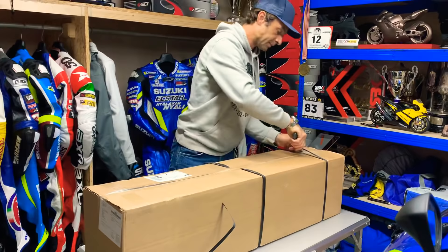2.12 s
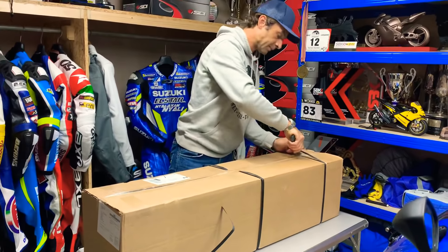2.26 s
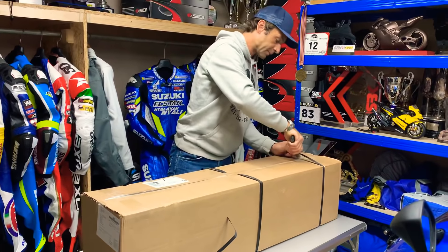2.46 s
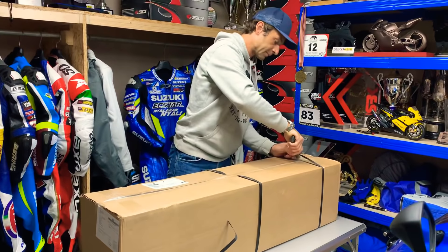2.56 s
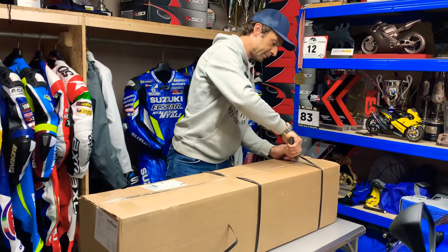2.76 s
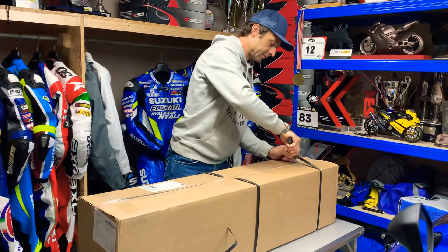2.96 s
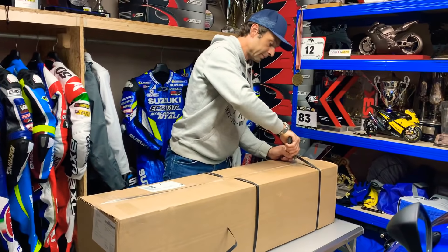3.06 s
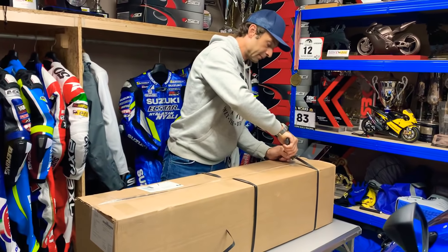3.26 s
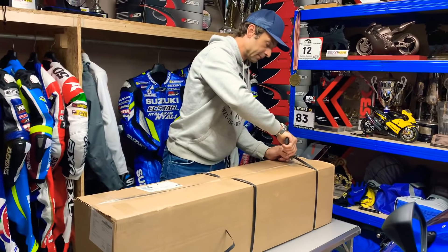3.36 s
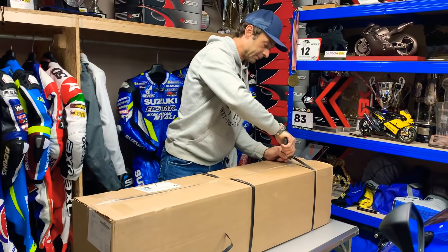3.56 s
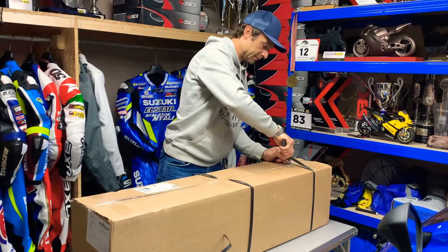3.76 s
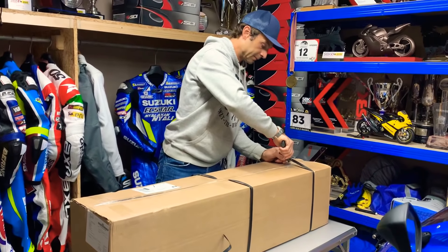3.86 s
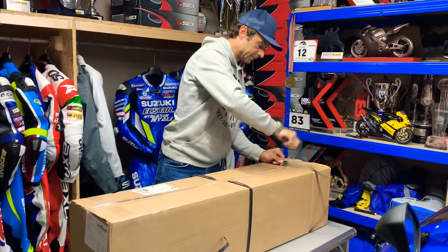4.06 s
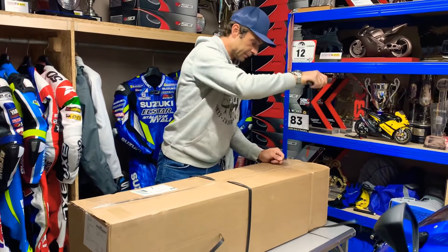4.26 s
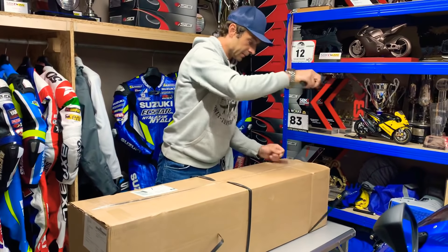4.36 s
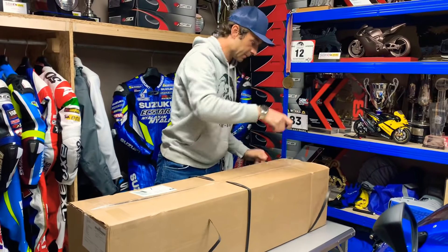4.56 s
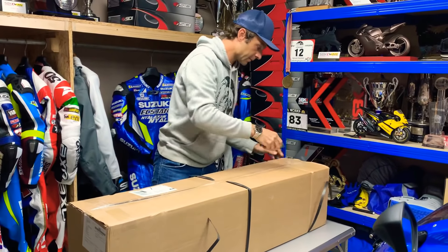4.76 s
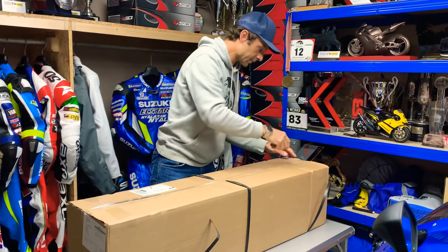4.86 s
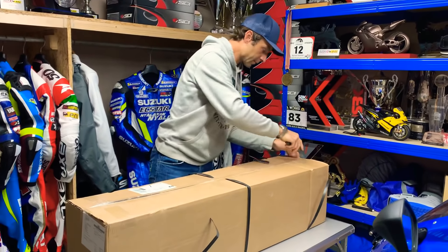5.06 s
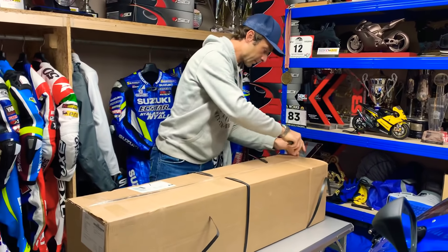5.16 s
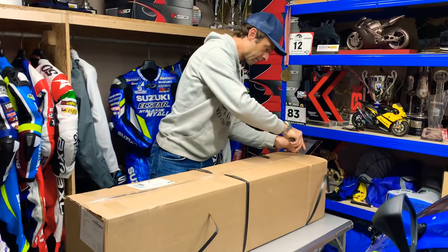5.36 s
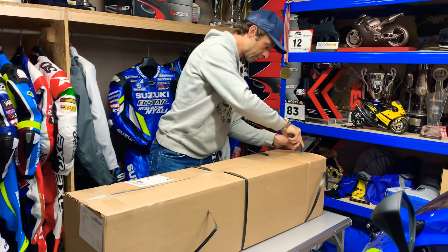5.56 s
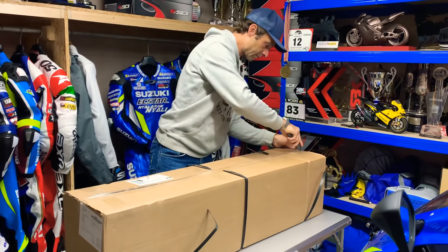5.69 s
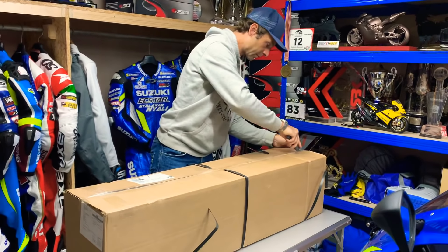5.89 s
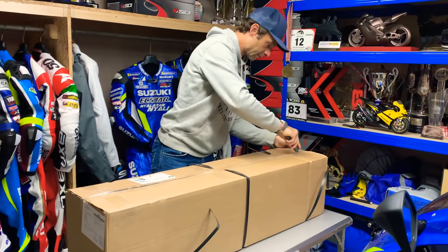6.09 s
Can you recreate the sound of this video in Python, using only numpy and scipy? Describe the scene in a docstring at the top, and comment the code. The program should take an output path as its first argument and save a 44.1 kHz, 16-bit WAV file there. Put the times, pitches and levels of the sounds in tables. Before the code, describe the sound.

In a small, crowded garage, faint creaks and blade ticks lead within half a second to a loud plastic snap and hollow cardboard boom. Quiet knocks, short scrapes and ticks follow. A thinner snap comes near three seconds, a fuller one at four with the loose strap slapping the box, then a weak one near the end. Close stereo microphone, slightly right, short dense echo.

```python
"""Faint creaks, knocks and blade ticks lead quickly to a loud snap: a plastic strap on a long, hollow
cardboard box is cut in a small, crowded garage. Three more snaps follow, each with a boom from the box.
Hits are made of ringing panels and short noise bursts; sliding, creaking and crackling of many tiny
random slips; the hum of the air in the box of two wavering sines. An echo of shaped noise is the garage."""
import sys
import numpy as np
from scipy import signal
from scipy.fft import rfft, irfft, next_fast_len
from scipy.io import wavfile
from scipy.ndimage import uniform_filter1d

SR = 44100
rng = np.random.default_rng(int(sys.argv[2]) if len(sys.argv) > 2 else 0)


def wrap_up_sound(samples):
    """Save the sound to the file named by the first command line argument, as 16-bit audio."""
    columns = np.atleast_2d(samples).T
    # keep every value between -1 and 1, then stretch to whole-number steps
    tamed = np.clip(columns, -1, 1)
    steps = np.round(tamed * 32767).astype(np.int16)
    wavfile.write(sys.argv[1], SR, steps)


N = 270333
TIME = np.arange(N) / SR
RING = TIME[:int(.6 * SR)]  # time within one hit or echo, s

# Levels in the tables are starting points: the functions add their own offsets.
# t60 is the time to fade by 60 dB.

# a strap parts: (t/s, box thump level/dB, thump tilt/dB per octave, panel slap level/dB, crack level/dB,
# crack tilt/dB per octave, crack t60/s, tick over crack/dB, liner crackle level/dB, strap twang f/Hz,
# twang level/dB, table jolt level/dB, first air mode level/dB, second air mode level/dB)
SNAPS = [(0.44, -9.5, 0.5, -15, -27.5, -1.5, .04, -10.5, -21, 1600, -22.5, -28.5, -15, -18),
         (2.908, -19, 6, -19.5, -28.5, -5.5, .025, -11, -62, 1496, -26, -35, -25.5, -43.5),
         (4.0416, -12.5, 1, -14.5, -31, -7, 0.029, 0, -20, 1090, -23, -27, -29.5, -29),
         (5.7902, -29, 2.5, -32.5, -37, -3.5, .06, 0, -28, 1034, -27, -45, -39, -42)]
# air inside the box: (f/Hz, t60/s, f/Hz of its partner in the flexing walls)
AIR_MODES = [(158, .7, 177), (231, .8, 243)]
# the cut strap whips the side of the box: (t/s, box thump level/dB, panel slap level/dB, crack level/dB)
WHIPS = [(4.444, -31, -29, -52), (4.477, -41, -43, -60), (4.484, -38, -35, -45)]
# the blade bites or slips on a strap: (t/s, crack level/dB, share passed on to the box over crack/dB)
BITES = [(0.123, -54, 3), (0.2076, -46, -23), (0.306, -56, 11), (0.326, -42.5, 3.5), (0.334, -30.5, -0.5),
         (0.3711, -27, -11), (0.432, -20.5, -5.5), (0.765, -52.5, -29), (1.305, -53.5, -15.5),
         (2.115, -47, -14.5), (2.2109, -57.5, -8), (2.352, -47.5, -4.5), (2.37, -62, 2), (2.478, -49, -28),
         (2.498, -52, 0.5), (2.517, -49.5, -0.5), (2.6032, -51, -1.5), (2.672, -55, -4.5), (2.836, -45, -3),
         (3.048, -46.5, -7), (3.4118, -52.5, -27), (3.872, -65.5, 11.5), (3.974, -56, -8),
         (4.3317, -48, -26), (4.391, -44.5, -3), (4.4, -41.5, -6), (4.9112, -49.5, 2.5), (4.995, -57, -2),
         (5.257, -48.5, -5), (5.409, -59.5, -13), (5.509, -46, -6.5), (5.523, -44, -10.5),
         (5.562, -48, -37.5), (5.62, -56, -30), (5.687, -49.5, -8.5), (5.696, -52.5, -13), (5.783, -50, 6)]
# short narrow squeaks and rings of blade, steel and strap:
# (t/s, pitch f/Hz, level/dB, length/s, width/share of the pitch)
SQUEAKS = [(0.136, 8900, -75, 0.015, 0.0071), (0.209, 4720, -66, 0.01, .015),
           (0.213, 8400, -66, 0.011, 0.033), (0.878, 1100, -49, 0.039, 0.08),
           (1.568, 4910, -56.5, 0.0053, 0.012), (3.98, 8130, -63.5, 0.016, 0.14),
           (4.832, 1614, -51, 0.0053, 0.12), (0.333, 1260, -30.5, 0.0051, 0.2),
           (2.065, 1875, -53, 0.0098, 0.053), (2.353, 2610, -59.5, 0.012, 0.088),
           (5.054, 2710, -57.5, 0.01, 0.24)]
# the steel cutter clinks as it is picked up: (t/s, level/dB)
CLINKS = [(4.813, -47.5), (4.82, -53), (4.832, -57)]
# hands and loose strap ends knock on the cardboard: (t/s, box thump level/dB, hardness/dB)
KNOCKS = [(0.004, -48.5, -1), (0.272, -46, -10), (0.34, -35.5, -16), (0.697, -43.5, -3.5),
          (1.357, -47.5, -21), (1.409, -63, 3.5), (1.452, -74.5, 13), (1.504, -39, -9.5),
          (1.523, -37.5, -16.5), (1.639, -46.5, -7.5), (1.786, -50.5, -9), (1.808, -48, -5),
          (1.844, -49, -6), (2.069, -55.5, 0.5), (2.253, -52, -6.5), (2.372, -56.5, 1), (2.52, -51.5, -9),
          (2.613, -45, -13), (2.663, -50, -14), (2.776, -64, 0.5), (3.301, -46, -9.5),
          (3.436, -53.5, -27.5), (3.767, -46.5, -12.5), (3.849, -45.5, -10), (4.245, -39.5, -8),
          (4.403, -36.5, -6.5), (4.663, -48.5, -3), (4.864, -64, 4.5), (4.919, -44.5, -16),
          (5.361, -58.5, -3.5), (6.075, -46.5, -12)]
# weight shifts and bumps the table: (t/s, table mode f/Hz, level/dB)
BUMPS = [(2.44, 63, -52), (4.93, 56, -57)]
# strap and sleeves slide over the cardboard, one row a stroke:
# (start t/s, speeding up/s, slowing down/s, hiss level/dB, scrape level/dB)
STROKES = [(0.585, 0.015, 0.032, -78.5, -76), (0.856, 0.021, 0.13, -51.5, -55),
           (1.11, 0.055, 0.047, -61, -68), (1.18, 0.025, 0.025, -65, -52), (1.492, 0.019, 0.16, -62, -58),
           (1.628, 0.22, 0.18, -55, -65.5), (4.37, 0.036, 0.23, -68, -59), (5.019, 0.051, 0.096, -73, -93),
           (5.958, 0.17, 0.12, -86, -57.5)]
# the box creaks under leaning hands or as it settles after a snap: (start t/s, length/s, level/dB)
CREAKS = [(0.0, 0.0068, -56), (0.551, 0.055, -45.5), (0.823, 0.15, -60.5), (1.314, 0.56, -62),
          (2.386, 0.25, -68), (3.196, 0.055, -66.5), (4.15, 0.33, -56), (4.72, 0.31, -66.5),
          (5.444, 0.65, -65), (6.005, 0.14, -56.5)]

# modes of the cardboard panels: (f/Hz, level/dB)
PANELS = [(178, -9.5), (245, -4.5), (288, 3), (335, 3), (425, 4), (476, 5.5), (610, 0), (655, 1.5),
          (820, 2), (1080, 6.5), (1285, -2), (1495, 8.5), (1625, -3), (1990, -1), (2240, -6.5), (2970, -3)]
# modes of the steel cutter: (f/Hz, level/dB, t60/s)
STEEL = [(1190, 4, .13), (1590, 3, .06), (1700, 1, .05), (2070, 4, .07), (2800, -9, .06), (3450, -6, .1),
         (4280, -8, .06), (4802, -10, .08), (5556, -11, .13), (6290, -7, .05), (6778, -11, .06),
         (9071, -9, .06)]
# the garage: (f/Hz, t60/s, echo over direct sound/dB, likeness of left and right from -1 to 1)
GARAGE = [(100, 0.057, 3, 0.9), (296, 0.11, 3, 0.8), (770, 0.31, -1.5, 0.05), (1990, 0.25, 1.5, 0),
          (5070, 0.32, 10, -.1), (9040, 0.2, 6.5, 0.02), (14000, 0.15, -2, 0)]

# The tables below are spectra: (f/Hz, level/dB per Hz)
# cracking plastic
CRACK = [(200, -20), (700, -7), (1800, 2), (3300, 3.5), (5500, -2.5), (9000, 4.5), (14500, -4), (16500, -8)]
# tick of the blade
TICK = [(1000, -15), (3000, -7.5), (8000, -8.5), (14000, 11), (16500, 4)]
# rough noise: the swell into a snap and the catches of a sliding strap's edge
ROUGH = [(150, -9.5), (350, 3.5), (1200, -2.5), (3000, -2.5), (9000, -31), (15000, -42)]
# crackling liner
CRACKLE = [(150, -14.5), (330, 0), (720, 6.5), (1000, 7), (1700, -5), (3000, -12.5), (6000, -29.5),
           (14000, -31)]
# flailing strap ends
FLAIL = [(110, -21), (170, -8), (260, 0), (430, 1.5), (620, 7), (900, -14.5), (1500, -11), (4000, -30),
         (12000, -45.5)]
# whipping strap end chattering on the liner
CHATTER = [(150, -32), (500, -1), (1000, 15), (1550, -2), (1900, -11), (2500, -10), (3300, -37),
           (8000, -50)]
# a scuff on the liner
SCUFF = [(150, -18.5), (400, -0.5), (1100, 2), (1900, -7), (3000, -13.5), (8000, -32.5)]
# hiss of sliding
HISS = [(1200, -13.5), (2200, -4), (3200, -10.5), (4300, -5.5), (5500, -12), (7500, -11.5), (10000, -14.5),
        (14000, -17), (16000, -31)]
# scrape of sliding
SCRAPE = [(300, 4), (700, 12), (1130, 9.5), (1400, 8.5), (2200, -5.5), (4000, -12.5)]
# creaking box walls
CREAK = [(100, -19.5), (170, 4), (255, 0.5), (450, -1.5), (700, -9.5), (1400, -11.5), (4000, -30.5),
         (12000, -37.5)]
# rumbling table
RUMBLE = [(20, -10), (55, 5.5), (90, -9.5), (140, -2.5), (300, -38)]
# steady air of the garage
QUIET = [(15, -58), (25, -19.5), (43, -23), (56, -10.5), (76, -6), (114, -13.5), (1020, -48.5),
         (7310, -56.5), (9570, -44.5), (16000, -54.5)]

PANEL_T60_S = .05  # lowest panel mode, before damping
RADIATE_HZ = 170  # the panels radiate little below this
SNAP_SAG, SAG_S = .2, .006  # a hard blow stiffens the panels: share by which they start sharp, settling time
JOLT_S = 0.015  # a snap jolts the table: time to the peak
ROCK_T60_S, SNAP_ROCK_DB, BUMP_ROCK_DB = 0.9, -33, -3  # the table rocks on: decay, level over thump or bump
HUM_DB, HUM_S = -6.5, .36  # the air's hum over its table level; time until it is over
WALL_DB, WALL_T60_S = 2.5, 0.21  # the air's partner in the walls over the same table level; its decay
WHIP_ROOM_DB = -2.5  # the whipped side faces the microphone, so it is heard with less echo
BITE_SLAP_DB, BITE_THUMP_DB = 0, 1.5  # how the box splits its share between liner and whole panels
BITE_T60_S = .035  # the crack of one bite fades over this time
# the hand beside the blade damps the panels; their pitch scatters from bite to bite by this share
HAND_DAMPING, BITE_SCATTER = 1.6, .14
# noise rising into each bite: level over the crack, how it follows the box's share (dB per dB), 60 dB rise time
RISE_DB, RISE_FOLLOWS, RISE_T60_S = -10, .6, .03
KNOCK_CRACK_DB = -17  # treble of a knock over its thump plus hardness
SOFT_LEAN = 0.58  # thump tilt in dB per octave for each dB of a knock's hardness
KNOCK_CONTACT_S, HALVING_DB = 0.004, 14  # contact time at hardness 0; hardness that halves it
CATCH_DB = -3  # ticks of a sliding strap's edge over its scrape
STROKE_POWER = 1.26  # friction noise grows with this power of the sliding speed
STRAIN_ATTACK_S, STRAIN_RELEASE_S = 0.059, 0.1
REST_DB, LOAD_DB = -81.5, -8.5  # creak under resting hands; rumble of the table over the creak
QUIET_DB = -72.5
NOTCH_HZ, NOTCH_WIDTH_HZ, TOP_HZ = 11720, 1500, 15700


def snaps():
    """Each snap comes from another spot on the strap, so it meets the shelves in its own way."""
    return sum(garage(snap(*row), room_db=-1.0) for *row, _, _ in SNAPS)


def snap(s, thump_db, lean_db, slap_db, crack_db, tilt_db, crack_t60, tick_db, crackle_db,
         twang_hz, twang_db, jolt_db):
    """Noise swells, the strap lets go with a crack and a twang, whips the box and jolts the table."""
    out = np.zeros(N)
    rise = rising_noise(ROUGH, .03)
    add(out, s - len(rise) / SR, amp((slap_db + twang_db) / 2 - 10.5) * rise)
    add(out, s, strike(thump_db, slap_db, crack_db, pitch=0.93, crack_t60=crack_t60, contact_s=0.0006,
                       tilt_db=tilt_db, scatter=0.028, tick_db=tick_db, damping=0.54,
                       lean_db=lean_db, sag=SNAP_SAG))
    twang = band(twang_hz, width=.45) * fade(.025 + crack_t60)
    add(out, s, amp(twang_db) * blow(twang))
    # the dented liner crackles as it springs back
    creases = colour(grains(per_s=900, spread_db=3.5)[:len(RING)], CRACKLE)
    add(out, s, amp(crackle_db) * blow(creases * fade(0.14) * (1 - fade(0.008))))
    # the freed ends flail against the walls of the box
    flailing = colour(noise(), FLAIL) * swell(0.011)
    add(out, s, amp(thump_db - 13.5) * blow(flailing))
    jolt = colour(noise(), RUMBLE) * swell(JOLT_S)
    add(out, s, amp(jolt_db) * blow(jolt))
    add(out, s, amp(thump_db + SNAP_ROCK_DB) * rocking())
    return out


def boom():
    """After each snap the walls throb roughly and the air shut in the box hums on two low, wavering notes."""
    out = np.zeros(N)
    ending = np.maximum(1 - (RING / HUM_S) ** 2, 0)
    for s, *_, first_db, second_db in SNAPS:
        for (hz, t60, wall_hz), db in zip(AIR_MODES, (first_db, second_db)):
            hum = amp(HUM_DB + 2 * waver(0.05)) * tone(hz, .05) * fade(t60) * ending
            wall = amp(WALL_DB) * tone(wall_hz, .08) * fade(WALL_T60_S)
            add(out, s, amp(db) * (hum + wall) * (1 - fade(0.044)))
    return out


def whips():
    """The cut strap swings down, its stiff end strikes the side of the box and chatters on the liner."""
    out = np.zeros(N)
    for s, thump_db, slap_db, crack_db in WHIPS:
        add(out, s, strike(thump_db, slap_db, crack_db, pitch=0.9, crack_t60=0.03, contact_s=0.0012,
                           tilt_db=-2, scatter=0.06, tick_db=-20, damping=0.9, lean_db=3, sag=0.1))
        add(out, s, amp(slap_db - 3) * blow(burst(CHATTER, 0.045)))
    return out


def cutter():
    """The blade bites or slips on the strap, with short squeaks and rings; its steel clinks when handled."""
    out = np.zeros(N)
    for s, crack_db, share_db in BITES:
        box_db = crack_db + share_db
        tilt_db = 1.5 * rng.standard_normal()
        rise = rising_noise(CRACK, RISE_T60_S)
        add(out, s - len(rise) / SR, amp(crack_db + RISE_DB + RISE_FOLLOWS * share_db) * rise)
        bite = strike(box_db + BITE_THUMP_DB, box_db + BITE_SLAP_DB, crack_db, pitch=1.03,
                      crack_t60=BITE_T60_S, contact_s=0.0005, tilt_db=tilt_db, scatter=BITE_SCATTER,
                      tick_db=-4.5, damping=HAND_DAMPING)
        add(out, s, amp(-4.5) * bite)
        # the strap jerks a little way over the liner
        slips = colour(grains(per_s=1800, spread_db=3)[:len(RING)], SCUFF)
        add(out, s, amp(box_db - 7.5) * blow(slips * swell(0.0022)))
    for s, hz, db, seconds, width in SQUEAKS:
        add(out, s, amp(db) * band(hz, width) * swell(seconds / 2))
    rattle = blow(colour(noise(), CRACK) * swell(0.0017))
    for s, db in CLINKS:
        add(out, s, amp(db) * (clink() + amp(-7) * rattle))
    return out


def clink():
    """The modes of the steel ring together, each a little louder or softer every time."""
    modes = 0
    for hz, mode_db, t60 in STEEL:
        level = amp(mode_db + 1.5 * rng.standard_normal())
        modes = modes + level * tone(hz, .012) * fade(t60)
    return blow(modes * (1 - fade(.012)))


def knocks():
    """Softer blows that scuff the cardboard as they land, and dull bumps of the table under it."""
    out = np.zeros(N)
    for s, thump_db, hardness_db in KNOCKS:
        slap_db = thump_db + hardness_db
        # a harder blow has a shorter contact
        contact_s = KNOCK_CONTACT_S * .5 ** (hardness_db / HALVING_DB)
        knock = strike(thump_db, slap_db - 2.0, slap_db + KNOCK_CRACK_DB, pitch=1.0, crack_t60=0.026,
                       contact_s=contact_s, tilt_db=-2.0, scatter=0.026, tick_db=-15.5, damping=0.84,
                       lean_db=SOFT_LEAN * hardness_db)
        add(out, s - .001, amp(-5.0) * knock)
        scuff = colour(noise(), SCUFF) * swell(.003)
        add(out, s - .001, amp(slap_db - 5) * blow(scuff))
    for s, hz, db in BUMPS:
        add(out, s, amp(db) * np.sin(2 * np.pi * hz * RING) * swell(0.02))
        add(out, s, amp(db + BUMP_ROCK_DB) * rocking())
    return out


def sliding():
    """Dense slips on paper fibres hiss and scrape under uneven pressure; the strap's edge catches in ticks."""
    pressure = amp(2 * unit(uniform_filter1d(rng.standard_normal(N), size=900)))
    hiss = colour(grains(per_s=7000, spread_db=3), HISS)
    scrape = colour(grains(per_s=350, spread_db=3), SCRAPE)
    catches = amp(CATCH_DB) * colour(grains(per_s=70, spread_db=2), ROUGH)
    out = np.zeros(N)
    for s, rise, fall, hiss_db, scrape_db in STROKES:
        out += stroke(s, rise, fall) * (amp(hiss_db) * hiss + amp(scrape_db) * (scrape + catches))
    return pressure * out


def stroke(start, rise, fall):
    """Friction level of one stroke: the hand speeds up, then slows to a stop."""
    return np.interp(TIME, [start, start + rise, start + rise + fall], [0, 1, 0]) ** STROKE_POWER


def creaking():
    """Sparse stick-slip in the box walls, and the table rumbling under the same load."""
    load = amp(REST_DB) + sum(amp(db) * strain(s, seconds) for s, seconds, db in CREAKS)
    creak = colour(grains(per_s=700, spread_db=3.5), CREAK)
    rumble = amp(LOAD_DB) * colour(rng.standard_normal(N), RUMBLE)
    return load * (creak + rumble)


def strain(start, seconds):
    """Strain in the box builds, holds for a while and relaxes."""
    since = np.maximum(TIME - start, 0)
    release = np.exp(-np.maximum(since - seconds, 0) / STRAIN_RELEASE_S)
    return (1 - np.exp(-since / STRAIN_ATTACK_S)) * release


def room_tone():
    """Faint steady air of the garage, partly the same in both ears."""
    mid, left, right = (colour(rng.standard_normal(N), QUIET) for _ in range(3))
    return amp(QUIET_DB) * (mid + 0.5 * np.array([left, right]))


def garage(x, room_db):
    """Direct sound, a little from the right, and the short dense echo of shelves and walls."""
    hz, *columns = np.transpose(GARAGE)
    bins = np.maximum(np.fft.rfftfreq(len(RING), 1 / SR), 1)
    octaves = np.clip(np.log2(bins / 62.5), 0, 8)
    hiss = rfft(rng.standard_normal((2, len(RING))))
    response = np.zeros((2, len(RING)))
    # one overlapping band an octave, from 62.5 Hz up
    for k in range(9):
        t60, wet_db, alike = (np.interp(k, np.log2(hz / 62.5), c) for c in columns)
        mid, side = irfft(hiss * np.maximum(1 - abs(octaves - k), 0), len(RING))
        tail = fade(t60) * (1 - fade(0.0045))
        opposite = side * np.array([[1], [-1]])
        pair = np.sqrt((1 + alike) / 2) * mid + np.sqrt((1 - alike) / 2) * opposite
        response += amp(wet_db + room_db) * pair * tail / np.sqrt(np.sum(tail ** 2))
    # the direct sound, left and right
    response[0, 0] += amp(-.8)
    response[1, 0] += amp(.8)
    response = even(response, 1 + amp(np.interp(np.log(bins), np.log(hz), columns[1])) ** 2)
    return signal.fftconvolve(x[None], response, axes=1)[:, :N]


def even(response, power):
    """Smooth an echo's spectrum to the wanted power, causally: a cluttered room favours no one note."""
    size = len(RING)
    actual = uniform_filter1d(np.mean(abs(rfft(response)) ** 2, axis=0), size=36)
    # keeping only the first half of the cepstrum makes the correction causal
    cepstrum = irfft(np.log(power / actual), size)[:size // 2]
    cepstrum[0] /= 2
    return irfft(rfft(response) * np.exp(rfft(cepstrum, size)), size)


def strike(thump_db, slap_db, crack_db, pitch, crack_t60, contact_s, tilt_db, scatter, tick_db, damping,
           lean_db=0, sag=0):
    """A blow on the box: whole panels thump, the liner slaps, the plastic ticks and cracks."""
    hz, db = np.transpose(PANELS)
    low = hz < 720  # these modes thump, the others slap
    chance = rng.standard_normal((2, len(PANELS)))
    # each blow lands on another spot, so other modes answer and share it differently
    hz = hz * pitch * (1 + scatter * chance[0])
    db = db + 25 * scatter * chance[1]
    # paper damps the higher modes sooner; a resting hand damps all
    t60 = PANEL_T60_S * np.sqrt(hz[0] / hz) / damping
    db = db + low * lean_db * np.log2(hz / hz[0])  # a softer blow favours the lowest modes
    modes = np.array([(-1) ** k * amp(db[k]) * ring(hz[k], t60[k], sag) for k in range(len(hz))])
    thump, slap = modes[low].sum(axis=0), modes[~low].sum(axis=0)
    # the tilt works below 5000 Hz
    tilted = [(f, level + tilt_db * np.log2(min(f, 5000) / 5000)) for f, level in CRACK]
    crack = burst(tilted, crack_t60)
    tick = burst(TICK, .007)
    # cardboard gives, so the contact takes a moment to build
    contact = 1 - np.exp(-(RING / contact_s) ** 2)
    plastic = blow(crack * contact) + amp(tick_db) * blow(tick)
    highpass = signal.butter(4, RADIATE_HZ, "high", fs=SR, output="sos")
    radiated = signal.sosfilt(highpass, thump * contact)
    return amp(thump_db) * blow(radiated) + amp(slap_db) * blow(slap * contact) + amp(crack_db) * plastic


def ring(hz, t60, sag=0):
    """One struck mode; it starts sharp by the share sag and settles as the dent springs back."""
    bent_time = RING + sag * SAG_S * (1 - np.exp(-RING / SAG_S))
    return np.sin(2 * np.pi * hz * bent_time) * fade(t60)


def rising_noise(spectrum, t60):
    """A short coloured noise that swells until the hit."""
    size = SR // 20
    return blow(colour(rng.standard_normal(size), spectrum) * fade(t60)[:size])[::-1]


def burst(spectrum, t60):
    """A short crackle with an even spectrum and no pitch of its own."""
    size = SR // 5
    bins = rfft(rng.standard_normal(size) * fade(t60)[:size])
    flat = irfft(bins / abs(bins), size)
    return np.pad(colour(flat, spectrum), (0, len(RING) - size)) * fade(10 * t60)


def rocking():
    """The table rumbles on after a jolt."""
    return blow(colour(noise(), RUMBLE) * fade(ROCK_T60_S) * (1 - fade(0.082)))


def grains(per_s, spread_db):
    """Tiny slips at random moments and of random size."""
    return (rng.random(N) < per_s / SR) * rng.standard_normal(N) * amp(spread_db * rng.standard_normal(N))


def tone(hz, width):
    """A sine whose pitch wanders over a share of its centre."""
    pitch = hz * (1 + width / 2 * waver(.5 / (hz * width)))
    return np.sin(2 * np.pi * np.cumsum(pitch) / SR)


def waver(seconds):
    """Random drift with the given time scale; spread 1."""
    return unit(uniform_filter1d(noise(), int(seconds * SR)))


def band(hz, width):
    """Noise in one resonance; width is a share of the centre frequency."""
    return unit(signal.lfilter(*signal.iirpeak(hz, 1 / width, fs=SR), noise()))


def noise():
    """Plain random noise as long as one hit."""
    return rng.standard_normal(len(RING))


def colour(x, spectrum):
    """Filter by (Hz, dB) points; rms 1."""
    hz, db = np.transpose(spectrum)
    size = next_fast_len(len(x), True)
    bins = np.maximum(np.fft.rfftfreq(size, 1 / SR), 1)
    shaped = rfft(x, size) * amp(np.interp(np.log(bins), np.log(hz), db))
    return unit(irfft(shaped, size)[:len(x)])


def swell(seconds):
    """A push that builds, peaks after the given time and dies away."""
    return RING / seconds * np.exp(1 - RING / seconds)


def fade(t60):
    """Exponential decay, 60 dB in t60 seconds."""
    return np.exp(-np.log(1000) * RING / t60)


def amp(db):
    """Decibels to gain."""
    return 10 ** (np.asarray(db) / 20)


def unit(x):
    """Scale a steady sound to rms 1."""
    return x / np.sqrt(np.mean(x ** 2))


def blow(x):
    """Scale a hit to the energy of 10 ms at rms 1."""
    return x / np.sqrt(np.sum(x ** 2) / (SR / 100))


def add(track, s, sound):
    """Mix a sound into a track at time s."""
    start = max(int(s * SR), 0)
    track[start:start + len(sound)] += sound[:N - start]


def scene():
    """Everything on the box sounds in the garage; its deep hum is equal on both sides, over the room's air."""
    blows = snaps() + garage(knocks(), room_db=1.0) + garage(whips(), room_db=WHIP_ROOM_DB)
    return blows + garage(cutter() + sliding() + creaking(), room_db=2.5) + boom() + room_tone()


def record(dry):
    """The loudest peaks are rounded; the microphone loses the deepest bass, one treble band and the top."""
    bass_cut = signal.butter(3, 32, "high", fs=SR, output="sos")
    heard = signal.sosfilt(bass_cut, np.tanh(dry))
    edges = NOTCH_HZ + NOTCH_WIDTH_HZ * np.array([-.5, .5])
    heard = signal.sosfilt(signal.butter(4, edges, "bandstop", fs=SR, output="sos"), heard)
    return signal.sosfilt(signal.ellip(8, .2, 70, TOP_HZ, fs=SR, output="sos"), heard)


dry = scene()
out = record(dry)
wrap_up_sound(out)
```